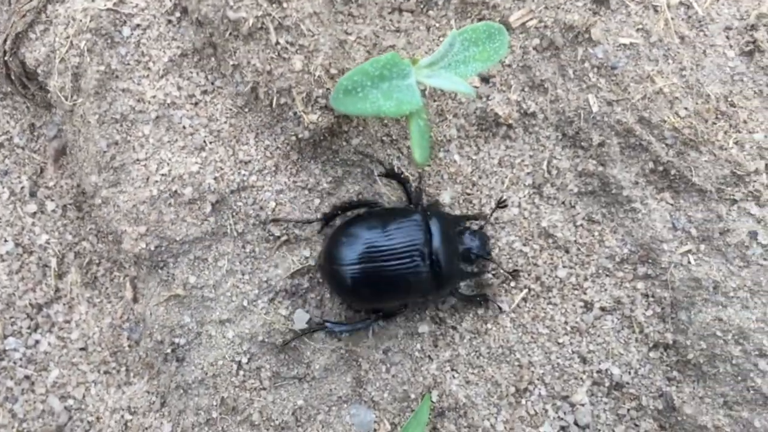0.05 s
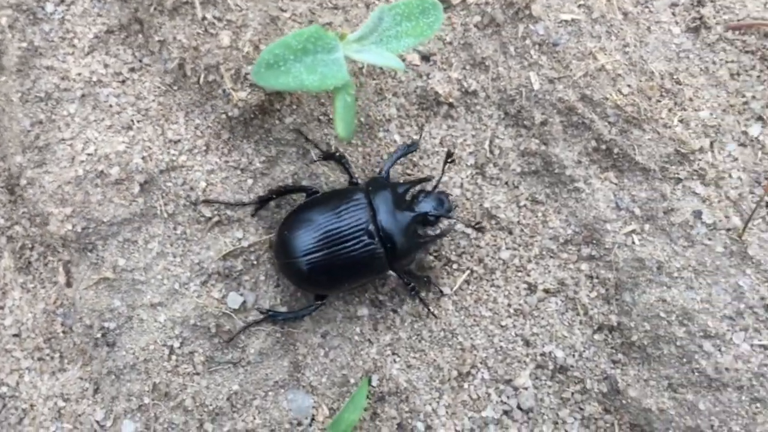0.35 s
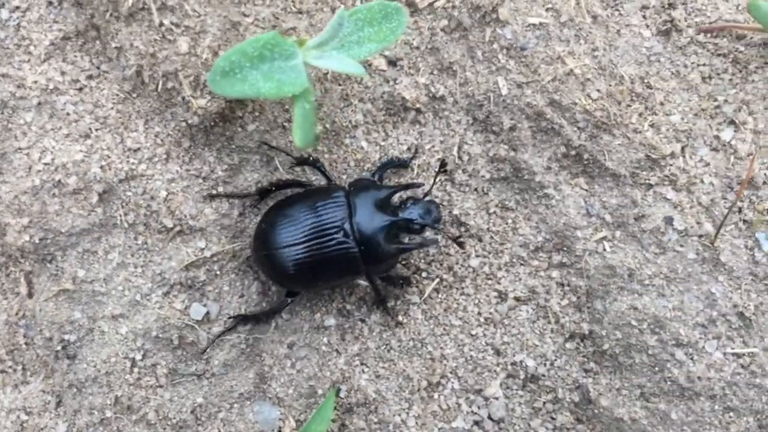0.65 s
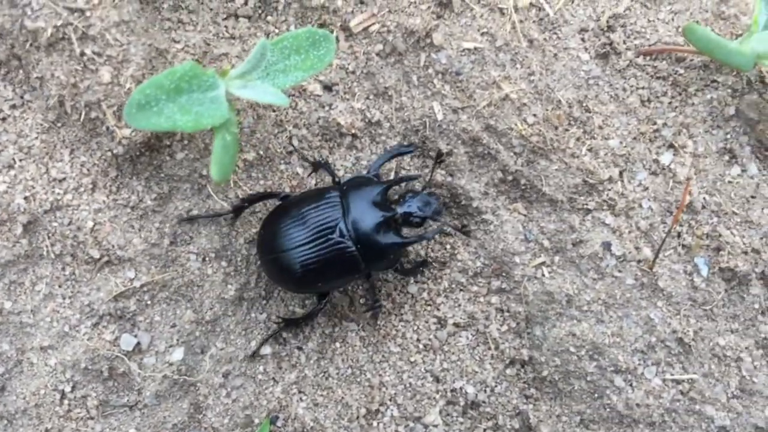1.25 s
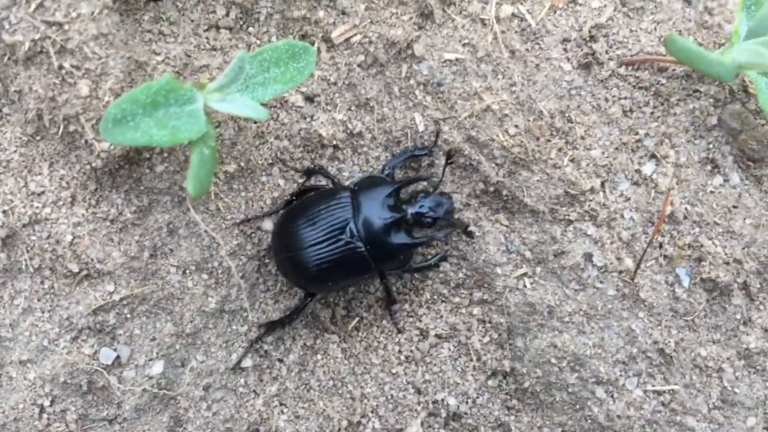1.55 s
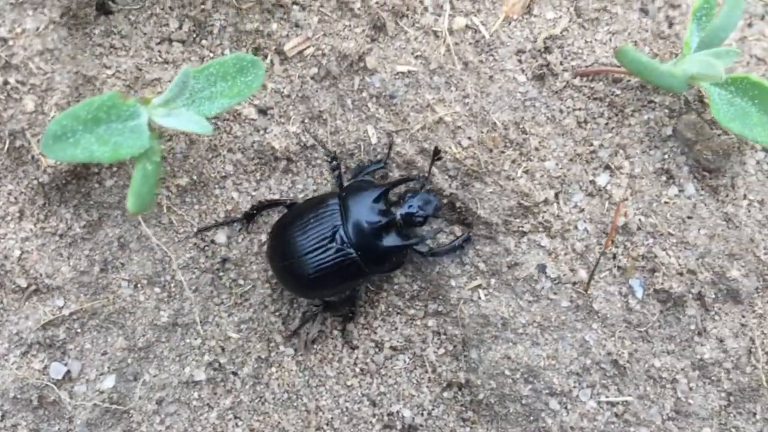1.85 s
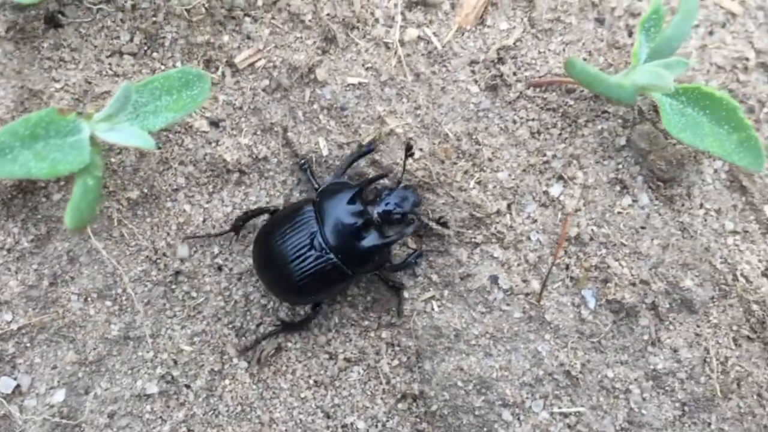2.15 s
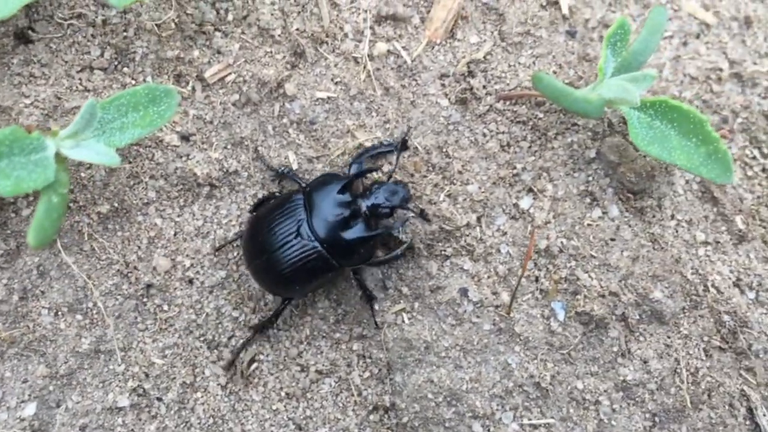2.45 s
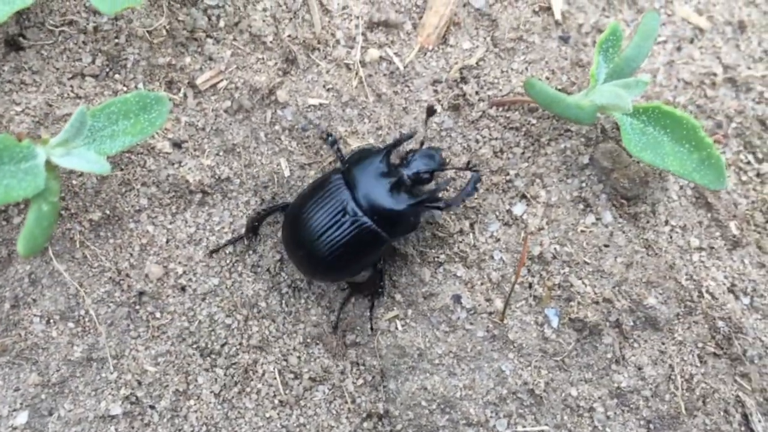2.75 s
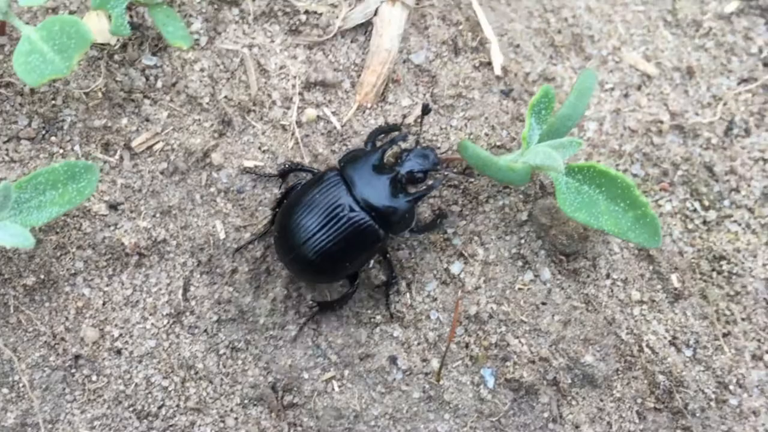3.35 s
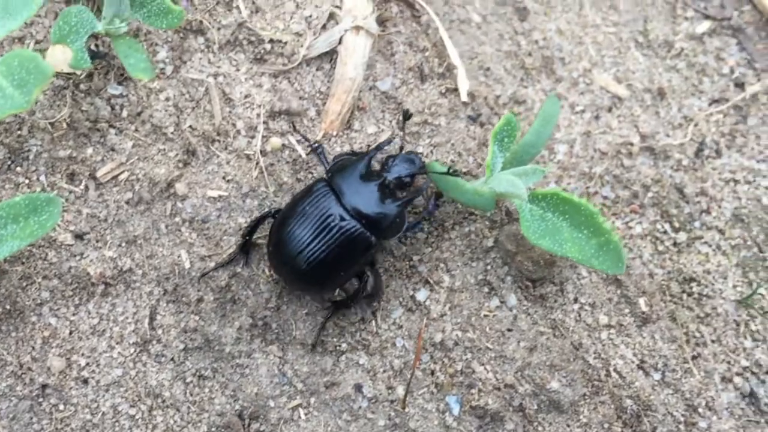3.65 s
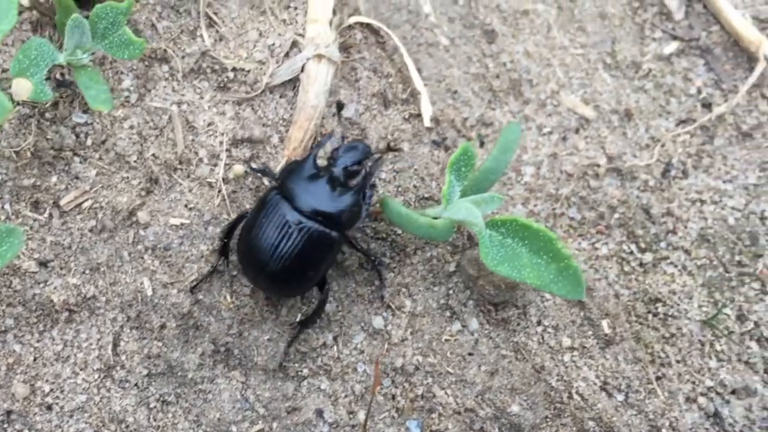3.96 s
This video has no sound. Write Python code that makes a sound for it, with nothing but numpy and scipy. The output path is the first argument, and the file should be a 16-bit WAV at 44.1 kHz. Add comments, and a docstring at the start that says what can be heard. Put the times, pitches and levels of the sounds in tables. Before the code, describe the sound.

A small bird whistles outdoors over distant engine rumble and soft hiss. Far birds twitter first, with a quick trill near 0.6 seconds. A long high note runs from 0.7 to 1.3 seconds, with a dull bump at 0.85. From 1.5 seconds, six thin whistles repeat about every half second, each after a faint husky slur. Grit ticks lightly, and soft far hoots come at 2 and 3.4 seconds.

```python
"""Far-off birds chirp and twitter first, over a low rumble, distant engines and a soft hiss of air.
A quick trill follows, and nearer the microphone one long, high note. Then a small bird in front
repeats a thin, steady whistle six times, with a husky falling slur farther back before each note.
The calls are sine tones, partly blurred into noise, and the open surroundings echo them faintly.
A dull bump, a few ticks and scrapes of dry grit and two soft, far hoots come in along the way."""
import sys
import numpy as np
from scipy import signal
from scipy.fft import rfft, irfft
from scipy.io import wavfile
from scipy.ndimage import uniform_filter1d

SR = 44100
rng = np.random.default_rng(int(sys.argv[2]) if len(sys.argv) > 2 else 0)


def put_to_file(sound):
    """Save the sound as 16-bit audio at rate SR, in the file named by the first command-line argument."""
    columns = np.atleast_2d(sound).T  # one column per channel
    safe = np.clip(columns, -1, 1)
    whole_steps = np.round(safe * 32767)
    wavfile.write(sys.argv[1], SR, whole_steps.astype(np.int16))


N = 176400
TIME = np.arange(N) / SR

# Spectra of the noise layers. Each row: frequency in Hz, relative level in dB.
RUMBLE_SPECTRUM = [(10, -44), (28, -30.5), (38, -15.5), (48, 1), (58, 4), (73, 4), (85, -2.5), (120, -7),
                   (170, -17.5), (215, -22), (300, -38.5), (600, -56), (2000, -100)]
UPPER_RUMBLE_SPECTRUM = [(20, -53), (150, -31), (210, -1.5), (260, -14.5), (400, -24.5), (2000, -70)]
AIR_SPECTRUM = [(20, -9), (200, 6.5), (330, 10.5), (450, 7.5), (620, 9), (800, 6), (1400, 2.5), (2100, 1.5),
                (2600, -1.5), (4000, -3), (5000, -6), (6200, -5), (7500, -8.5), (9300, -7.5), (10400, -13),
                (11500, -10), (16000, -12.5)]
TWITTER_SPECTRUM = [(20, -80), (3400, -43), (3900, -6), (4150, -7), (4380, -11), (4620, 2.5), (4800, -36),
                    (5300, -36), (16000, -85)]
GRIT_SPECTRUM = [(20, -42), (1000, 15), (3000, 11), (6000, 9), (10400, 4), (13500, 11), (16000, -8)]
# How these sounds swell and fade. Each row: time in seconds, level in dB.
RUMBLE_LEVEL = [(0, -51), (.85, -49), (1.15, -49.5), (1.5, -49), (1.8, -47), (2.55, -48.5), (2.8, -53.5),
                (3.4, -46.5), (4, -47)]
UPPER_RUMBLE_LEVEL = [(0, -77), (1.0, -84.5), (1.25, -62), (1.45, -75), (1.7, -70), (2.0, -76), (2.4, -72),
                      (4, -98)]
TWITTER_LEVEL = [(0, -74), (.06, -75), (.13, -73), (.2, -78), (.27, -73), (.34, -85), (.42, -75),
                 (.56, -89)]
TRILL_LEVEL = [(.56, -75), (.63, -72), (.67, -73), (.705, -65.5), (.75, -71), (.83, -70)]
# Heavy engines. Each row: time in seconds, lower pitch in Hz, upper pitch in Hz, level in dB.
ENGINE_THROB = [(0, 50.18, 69.3, -49), (.9, 50.62, 68.43, -49), (1.4, 50.96, 70.08, -66),
                (1.8, 51.13, 72.08, -53), (2.4, 52.76, 72.8, -51.5), (2.8, 57.96, 75, -48),
                (3.4, 58.06, 76.33, -45.5), (4, 60.1, 76.5, -52)]
# A distant engine and a steadier drone. Each row: time in seconds, pitch in Hz, level in dB.
ENGINE_HUM = [(0, 146.8, -56.5), (.5, 150, -57), (.85, 154.9, -59.5), (1.2, 159, -64.5), (1.7, 165.5, -63),
              (2.5, 172.6, -69.5), (2.8, 167.3, -89), (3.5, 164.5, -65), (4, 163.5, -72)]
ENGINE_DRONE = [(0, 272, -70.5), (.45, 271.5, -72), (.85, 268, -78.5), (1.25, 269.6, -70),
                (2.1, 273.1, -69.5), (2.55, 269.9, -78), (2.85, 268.1, -75.5), (4, 264.6, -73.5)]
# Birds farther off. Each row: start and length in seconds, first, middle and last pitch in Hz,
# level in dB, roughness from 0 to 1.
CHIRPS = [(.014, 0.047, 6740, 6580, 6520, -69, 0.5), (0.156, .058, 6790, 6610, 6570, -69.5, 0.83),
          (0.08, 0.068, 3510, 3620, 3670, -72, 0.5), (0.125, 0.06, 4610, 4650, 4630, -73.5, 0.54),
          (.14, 0.055, 2200, 2170, 2140, -81.5, 0.4), (.245, 0.047, 2190, 2140, 2126, -73.5, 0.04),
          (0.305, 0.046, 5400, 5220, 5300, -76, 0), (0.372, 0.03, 4660, 4700, 4670, -69.5, 0.1),
          (0.415, .13, 2019, 1940, 1890, -78, 0.41), (.705, 0.092, 3350, 3240, 3270, -73, 0.45),
          (0.777, 0.078, 3070, 2975, 2810, -67, 0.3), (0.224, .055, 6580, 6550, 6400, -82, .6),
          (0.236, .09, 7930, 8200, 8730, -84.5, 0.7), (1.613, 0.0594, 2680, 3110, 3100, -77.5, 0.2),
          (1.901, 0.021, 2780, 2954, 3215, -68, 0.4), (2.345, 0.044, 3071, 3042, 2994, -67.5, 0.2),
          (2.502, 0.069, 2185, 2140, 1990, -75.5, 0.19), (2.861, 0.019, 3634, 3750, 3870, -65.5, 0.5),
          (3.826, 0.11, 2270, 2166, 2114, -79, 0.18)]
# The long note in front. Each row: time in seconds, pitch in Hz, level in dB.
LONG_NOTE = [(.715, 4750, -84), (.745, 4720, -71.5), (.81, 4690, -80), (.9, 4656, -79.5), (1.0, 4710, -73),
             (1.15, 4676, -74), (1.262, 4670, -72), (1.288, 4650, -78)]
# Its echoes. Each row: delay in seconds, level in dB relative to the note.
LONG_NOTE_ECHOES = [(.047, -11), (.112, -12)]
# A low bump. Each row: middle in seconds, level in dB.
BUMPS = [(.853, -36)]
# Scrapes on the soil. Each row: middle in seconds, half length in seconds, level in dB.
SCRAPES = [(3.34, .04, -84), (3.745, .06, -81)]
# Ticks of grit, slurred calls and far hoots. Each row: start in seconds, level in dB.
TICKS = [(1.125, -68.5), (1.501, -73.5), (3.351, -75), (3.775, -77)]
SLURS = [(1.335, -87), (1.815, -77.5), (2.29, -76.5), (2.757, -78.5), (3.228, -75.5), (3.706, -75.5)]
HOOTS = [(2.02, -74), (3.42, -74)]
# The slide of one slur. Each row: seconds into the note, pitch in Hz.
SLUR_PITCH = [(0, 3560), (.02, 3400), (.05, 3070), (.085, 2870), (.115, 3030)]
# The small bird in front. Each row: start and length in seconds, pitch in Hz, accent level in dB,
# accent length in seconds, echo in dB relative to the note.
WHISTLES = [(1.540, 0.15, 4380, -67.5, 0.036, -7), (2.014, .172, 4310, -66.5, .04, -18),
            (2.481, 0.16, 4336, -66, 0.048, -33), (2.953, 0.19, 4328, -67, 0.072, -17),
            (3.431, .175, 4330, -65, 0.061, -27), (3.91, .17, 4320, -71.5, .085, -22)]
# Early echoes of the surroundings. Each row: delay in seconds, level in dB relative to the tail.
EARLY_ECHOES = [(0.015, -6), (.031, -18)]


def amp(db):
    """Decibels to gain."""
    return 10 ** (np.asarray(db) / 20)


def unit(x):
    """Scales to rms 1."""
    return x / np.sqrt(np.mean(abs(x) ** 2) + 1e-20)


def add(mix, start_s, sound):
    """Mixes a sound in at a time."""
    part = mix[max(round(start_s * SR), 0):][:len(sound)]
    part += sound[:len(part)]


def curve(rows, t=TIME, column=1):
    """One column of a table, joined by straight lines in time."""
    columns = np.transpose(rows)
    return np.interp(t, columns[0], columns[column])


def noise(spectrum):
    """Noise of rms 1 with a given spectrum."""
    hz, db = np.transpose(spectrum)
    gain = amp(np.interp(np.log(np.fft.rfftfreq(N, 1 / SR) + 1), np.log(hz), db))
    return unit(irfft(rfft(rng.standard_normal(N)) * gain, N))


def wander(rate_hz, size):
    """Smooth random motion of rms about 1."""
    span = max(size, SR)
    lowpass = np.exp(-(np.fft.rfftfreq(span, 1 / SR) / rate_hz) ** 2)
    return unit(irfft(rfft(rng.standard_normal(span)) * lowpass, span))[:size]


def tone(hz, rough, blur_hz):
    """A sine on a pitch curve: pure at roughness 0, a narrow band of noise at 1."""
    blur = (wander(blur_hz, len(hz)) + 1j * wander(blur_hz, len(hz))) / np.sqrt(2)
    carrier = np.exp(2j * np.pi * np.cumsum(hz) / SR)
    return np.sqrt(2) * ((np.sqrt(1 - rough ** 2) + rough * blur) * carrier).real


def fade(t, rise_s, fall_s):
    """Smooth attack, hold and release."""
    attack = np.sin(np.pi / 2 * np.clip(t / rise_s, 0, 1))
    release = np.sin(np.pi / 2 * np.clip((t[-1] - t) / fall_s, 0, 1))
    return attack * release


def swell(t, middle_s, half_s):
    """A bell-shaped rise and fall."""
    return np.exp(-((t - middle_s) / half_s) ** 2)


def echoed(sound, echoes):
    """A sound and its reflections, which reach the microphone later."""
    out = np.zeros(len(sound) + SR // 4)
    add(out, 0, sound)
    for delay, db in echoes:
        add(out, delay + .00028 * rng.standard_normal(), amp(db) * sound)
    return out


def outdoors(sound, tail_db, t60_s=.45):
    """The surroundings return two early echoes and a thin scattered tail."""
    t = TIME[:SR]
    envelope = amp(-60 * t / t60_s) * np.minimum(t / .011, 1)
    response = unit(rng.standard_normal(SR) * envelope) / np.sqrt(SR)
    for delay, db in EARLY_ECHOES:
        response[round(abs(delay + .0003 * rng.standard_normal()) * SR)] += amp(db)
    return sound + amp(tail_db) * signal.fftconvolve(sound, response)[:N]


def rumble():
    """Distant traffic: two bands of low noise, each swelling on its own."""
    lower = noise(RUMBLE_SPECTRUM) * amp(curve(RUMBLE_LEVEL))
    upper = noise(UPPER_RUMBLE_SPECTRUM) * amp(curve(UPPER_RUMBLE_LEVEL))
    return lower + upper


def engines():
    """Far engines: two low tones beat into a throb under a wavering hum and a drone."""
    lower = tone(curve(ENGINE_THROB), rough=.42, blur_hz=5)
    upper = amp(-3) * tone(curve(ENGINE_THROB, column=2), rough=.42, blur_hz=4.4)
    throb = amp(curve(ENGINE_THROB, column=3)) * (lower + upper)
    hum = amp(curve(ENGINE_HUM, column=2)) * tone(curve(ENGINE_HUM), rough=.65, blur_hz=17.5)
    fundamental = tone(curve(ENGINE_DRONE), rough=.62, blur_hz=20)
    octave = amp(-11) * tone(2 * curve(ENGINE_DRONE), rough=.99, blur_hz=13)
    drone = amp(curve(ENGINE_DRONE, column=2)) * (fundamental + octave)
    return throb + hum + drone


def air(level_db=-69.5, patchy_db=1.0):
    """Soft hiss of open air, slightly patchy in frequency and time."""
    spectrogram = signal.stft(noise(AIR_SPECTRUM), nperseg=512)[2]
    patches = uniform_filter1d(rng.standard_normal(spectrogram.shape), size=8, axis=0)
    patches = unit(uniform_filter1d(patches, size=10, axis=1))
    hiss = signal.istft(spectrogram * amp(patchy_db * patches), nperseg=512)[1][:N]
    return amp(level_db) * unit(hiss)


def twitter():
    """Distant birds, blurred into a flickering band of noise."""
    band = noise(TWITTER_SPECTRUM)
    level_db = curve(TWITTER_LEVEL) + 2.1 * wander(24, N)
    return band * amp(level_db) * (TIME < TWITTER_LEVEL[-1][0])


def chirp(length_s, first_hz, middle_hz, last_hz, db, rough):
    """A short note from farther off that bends through three pitches."""
    t = np.arange(0, length_s, 1 / SR)
    bend = np.polyfit([0, .5, 1], [first_hz, middle_hz, last_hz], 2)
    hz = np.polyval(bend, t / length_s)
    return amp(db) * fade(t, rise_s=.0097, fall_s=.0056) * tone(hz, rough, blur_hz=240)


def trill(pips_per_s=52, centre_hz=3730, fall_hz=390):
    """A far bird's quick run of tiny falling pips."""
    t = np.arange(TRILL_LEVEL[0][0], TRILL_LEVEL[-1][0], 1 / SR)
    cycle = (t - t[0]) * pips_per_s % 1
    hz = centre_hz + fall_hz * (.5 - cycle)
    pips = np.sin(np.pi * cycle) ** 2 * tone(hz, rough=.88, blur_hz=151)
    return amp(curve(TRILL_LEVEL, t)) * fade(t - t[0], rise_s=.005, fall_s=.0045) * pips


def long_whistle():
    """A high note in front, held for over half a second and sinking slightly, with two echoes."""
    t = np.arange(LONG_NOTE[0][0], LONG_NOTE[-1][0], 1 / SR)
    envelope = amp(curve(LONG_NOTE, t, column=2)) * fade(t - t[0], rise_s=.01, fall_s=.017)
    return echoed(envelope * tone(curve(LONG_NOTE, t), rough=.3, blur_hz=70.6), LONG_NOTE_ECHOES)


def bump(pitch_hz=68, octave_db=-7):
    """A dull thud: a few cycles of a low tone and its octave."""
    envelope = sum(amp(db) * swell(TIME, middle, half_s=.016) for middle, db in BUMPS)
    phase = 2 * np.pi * (pitch_hz * TIME + rng.random())
    return envelope * (np.sin(phase) + amp(octave_db) * np.sin(2 * phase))


def grit(decay_s=.004):
    """Dry grains of soil tick and scrape in short bursts of bright noise."""
    ticks = sum(amp(db) * (TIME >= start) * np.exp(-abs(TIME - start) / decay_s) for start, db in TICKS)
    scrapes = sum(amp(db) * swell(TIME, middle, half) for middle, half, db in SCRAPES)
    bright = noise(GRIT_SPECTRUM)
    graininess = unit(amp(4.3 * wander(200, N)))
    return bright * (ticks + scrapes * graininess)


def slur(db):
    """A husky note farther back that slides down and hooks up at its end."""
    t = np.arange(0, SLUR_PITCH[-1][0], 1 / SR)
    voice = tone(curve(SLUR_PITCH, t), rough=.87, blur_hz=260)
    return amp(db) * fade(t, rise_s=.0097, fall_s=.0056) * voice


def whistle(length_s, pitch_hz, db, accent_s, echo_db, echo_s=.033):
    """The near bird scoops up into an accented, nearly pure note, breaks briefly and flicks up."""
    t = np.arange(0, length_s, 1 / SR)
    scoop = np.exp(-t / .016)
    sag = (1 + np.tanh((t - accent_s) / .012)) / 2  # the level drops after the accent
    gap = swell(t, length_s - .027, half_s=.003)
    flick = swell(t, length_s - .016, half_s=.009)
    hz = pitch_hz - 60 * scoop + 60 * flick + 4.1 * wander(40, len(t))
    level_db = db - 6.5 * sag - 9 * gap + 1.5 * flick + 2.15 * wander(32, len(t))
    envelope = amp(level_db) * fade(t, rise_s=.015, fall_s=.016)
    return echoed(envelope * tone(hz, rough=.3, blur_hz=151), [(echo_s, echo_db)])


def hoot(db, length_s=.098, hz=542):
    """A soft, far call on one low pitch."""
    return chirp(length_s, hz, hz, hz, db, rough=.54)


def birds():
    """Whistles near the microphone; the other calls stand farther off and carry more echo."""
    near, far = np.zeros(N), np.zeros(N)
    for start, *note in WHISTLES:
        add(near, start, whistle(*note))
    add(near, LONG_NOTE[0][0], long_whistle())
    for start, db in SLURS:
        add(far, start, slur(db))
    for start, *note in CHIRPS:
        add(far, start, chirp(*note))
    for start, db in HOOTS:
        add(far, start, hoot(db))
    add(far, TRILL_LEVEL[0][0], trill())
    return outdoors(near, tail_db=-15) + outdoors(far, tail_db=-11)


def scene():
    """Birds over a quiet outdoor background, at one microphone."""
    return (birds() + twitter() + rumble() + engines() + air() + grit() + bump())[None]


def record(dry):
    """The recorder's band limit cuts off the highest treble."""
    cutoff_hz = 15850
    lowpass = signal.firwin(511, cutoff_hz, window=("kaiser", 9), fs=SR)
    return signal.oaconvolve(dry, lowpass[None], "same")


dry = scene()
out = record(dry)
put_to_file(out)
```